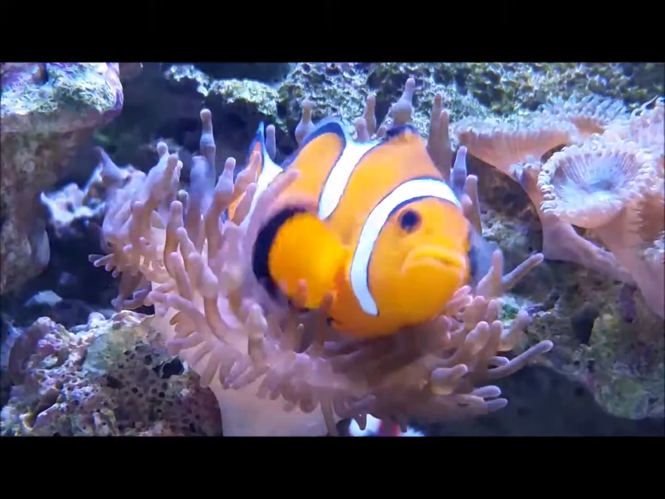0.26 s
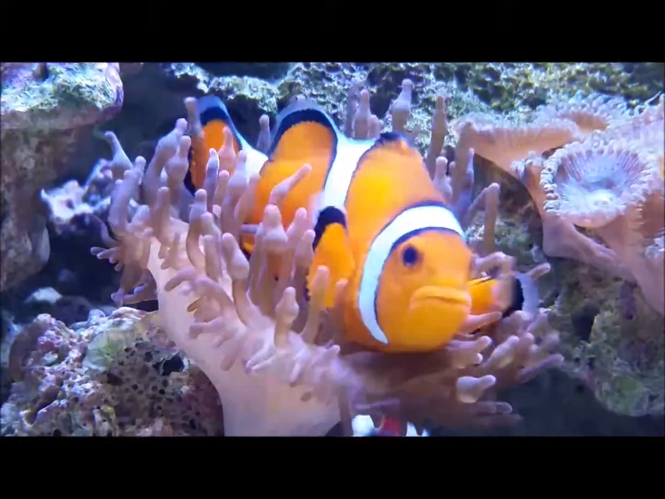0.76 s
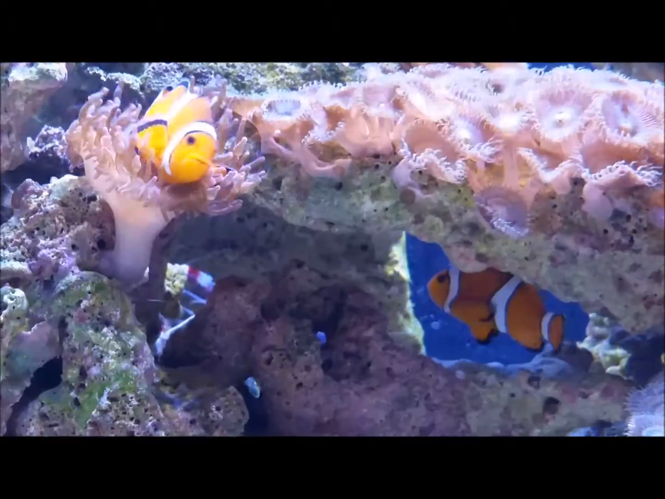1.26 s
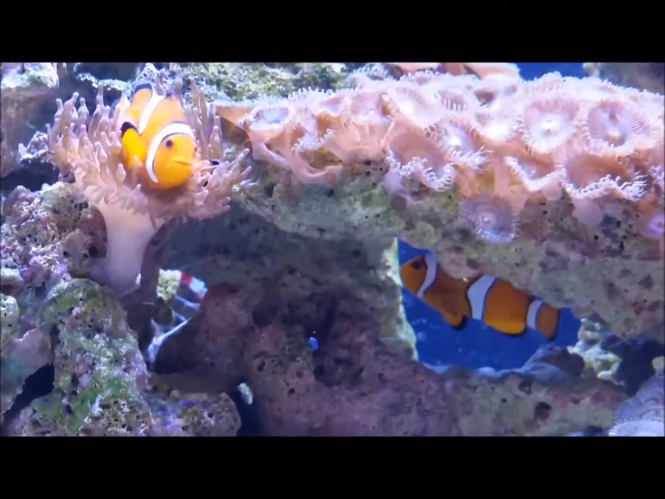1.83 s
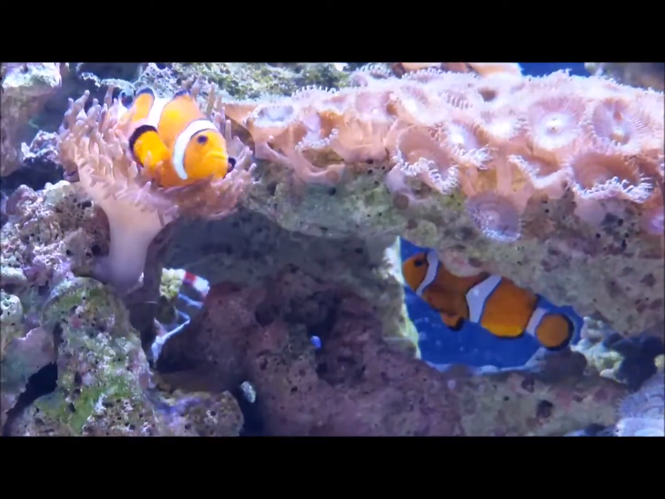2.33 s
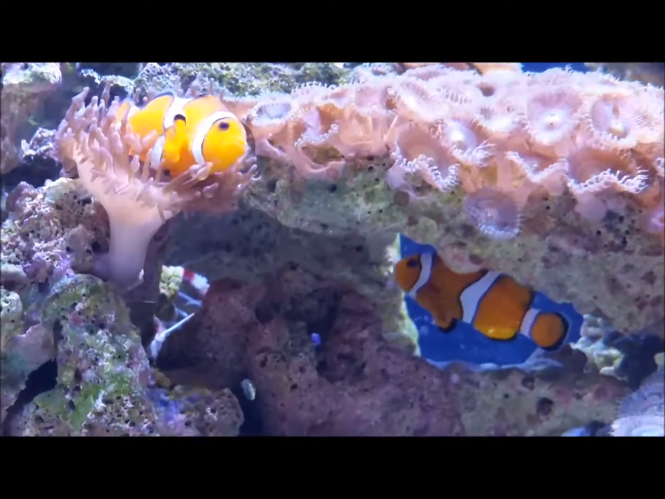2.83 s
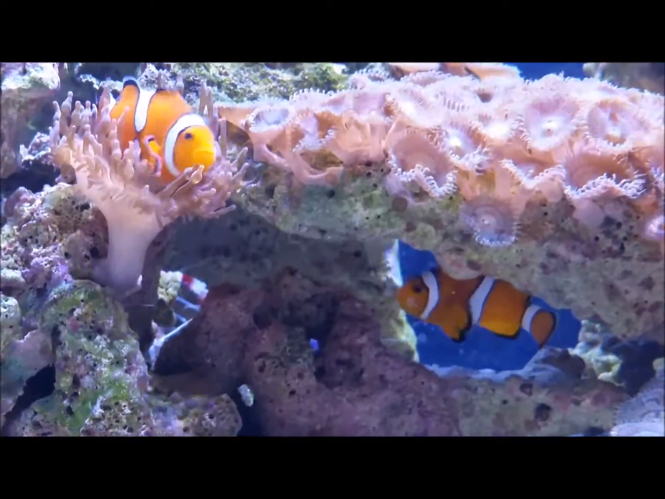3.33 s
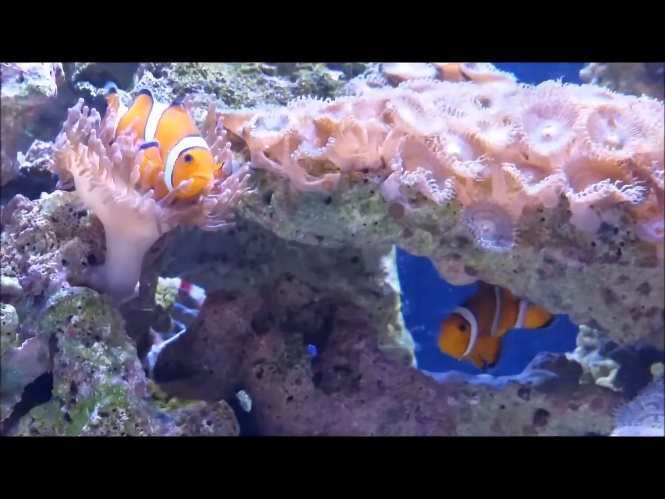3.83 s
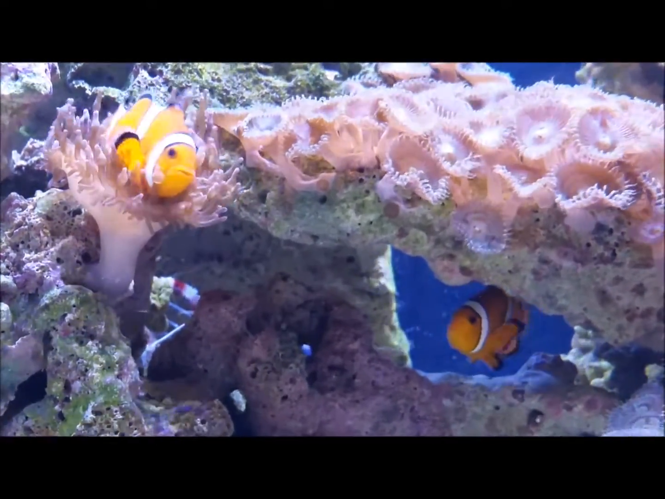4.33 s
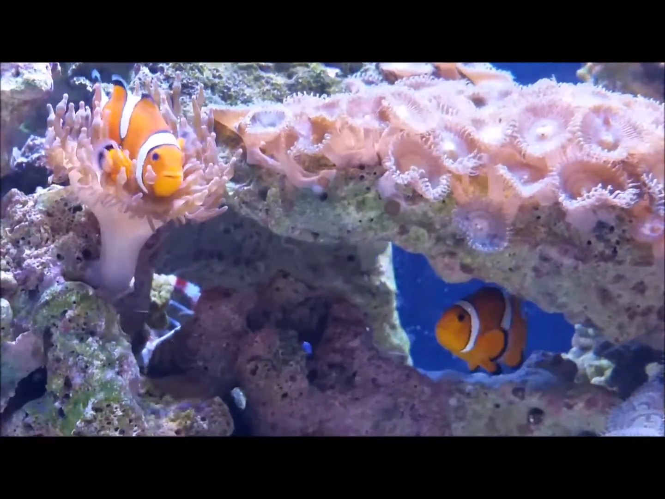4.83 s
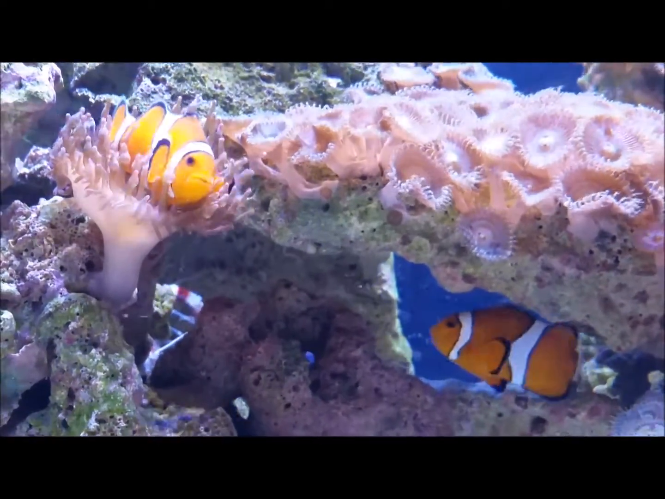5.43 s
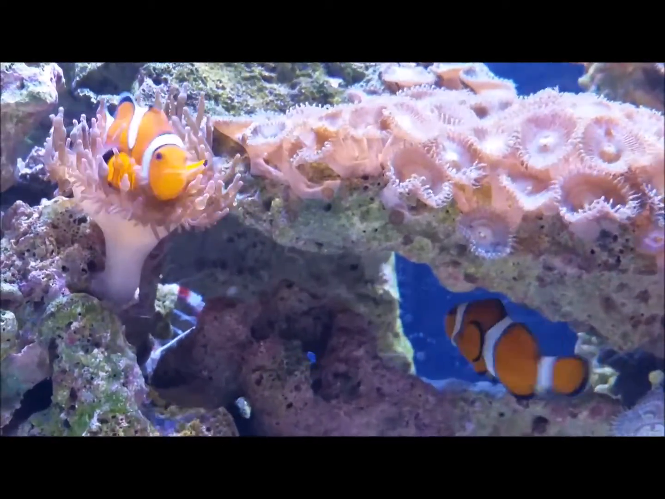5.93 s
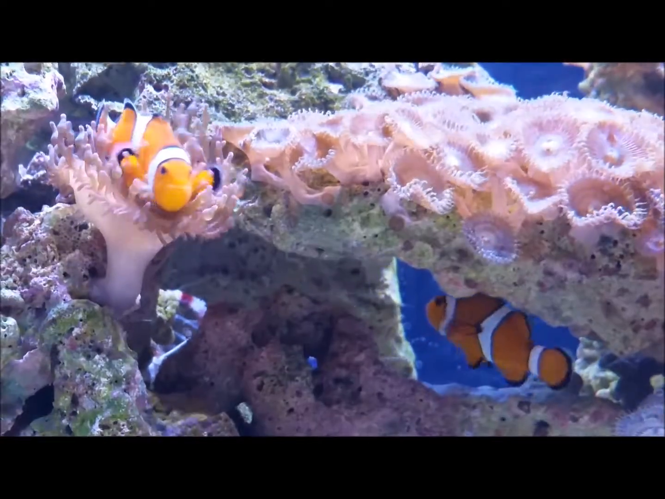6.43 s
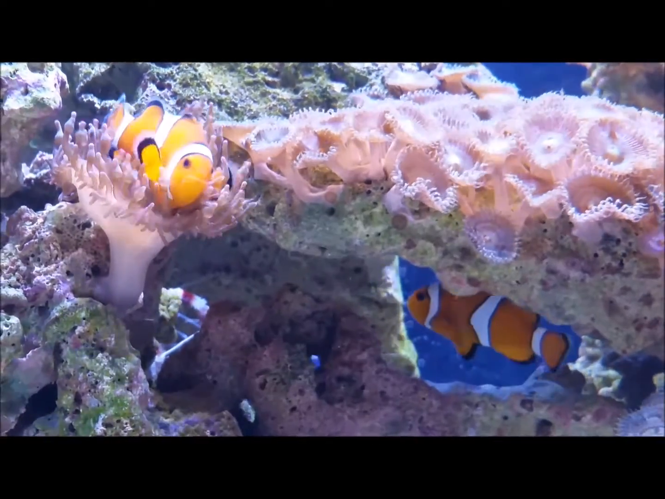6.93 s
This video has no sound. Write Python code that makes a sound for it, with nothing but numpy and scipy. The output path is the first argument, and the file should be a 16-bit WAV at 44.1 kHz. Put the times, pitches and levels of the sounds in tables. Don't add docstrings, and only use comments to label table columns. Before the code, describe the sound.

A heavy steady electric drone dominates the first second, left of center, while water rings in a pipe and air bubbles plop. An abrupt cut drops the drone to a soft indoor hum. Irregular watery tinkles and light spray continue over gently heaving rumble, with a faint motor hiss close to the stereo microphone's left side, occasional dull knocks and a small gurgling run near the end.

```python
import sys
import numpy as np
from scipy import signal
from scipy.io import wavfile
from scipy.ndimage import uniform_filter1d

SR = 44100
rng = np.random.default_rng(int(sys.argv[2]) if len(sys.argv) > 2 else 0)


def unload_wav(signal):
    wavfile.write(
        sys.argv[1],
        SR,
        np.round(np.clip(np.atleast_2d(signal).T, -1, 1) * 32767).astype(np.int16),
    )


def invert_db(x):
    u = np.asarray(x, float) / 20
    return 10 ** u


N = 316638
NEAR, FAR = 0, 1
CHANGE_S = 1.10699


def evened(x):
    return x / np.sqrt(np.mean(x ** 2) + 1e-20)


def read(points, hz):
    f, value = np.transpose(points)
    return np.interp(np.log(hz + 1), np.log(f + 1), value)


def ports(pan_db):
    return invert_db(np.array([[.5], [-.5]]) * pan_db)


def add(mix, s, sound, pan_db):
    part = mix[:, round(s * SR):][:, :len(sound)]
    part += sound[:part.shape[1]] * ports(pan_db)


def correlated(left, other, like):
    like = np.clip(like, -1, 1)
    return like * left + np.sqrt(1 - like ** 2) * other


def noise(spectrum, size, patchy_db, count=N, same=((1, 0),), tilt=((1, 0),), modes=(), surge=((0, 0),)):
    surge_hz, surge_octaves, surge_share = 232, 0.98, 0.56
    top_hz = min(spectrum[-1][0], 15715)
    frames, hz = 4 * count // size + 5, np.fft.rfftfreq(size, 1 / SR)
    a, b, c, d, patches = rng.standard_normal((frames, len(hz), 5)).T
    patches = uniform_filter1d(patches, size=12, axis=0)
    patches = evened(uniform_filter1d(patches, size=8, axis=1))

    shape_db = read(spectrum, hz) - 80 * ((hz < spectrum[0][0]) | (hz > top_hz))
    for f, width, db in modes:
        shape_db += db / (1 + (2 * (hz - f) / width) ** 2)
    swell_db = np.interp(np.arange(frames) * size / 4 / SR, *np.transpose(surge))
    swell_db = swell_db - np.max(surge, 0)[1]
    reach = surge_share * np.exp(-(np.log2((hz + 1) / surge_hz) / surge_octaves) ** 2)

    left = a + 1j * b
    z = np.array([left, correlated(left, c + 1j * d, read(same, hz)[:, None])])
    z *= invert_db(shape_db[:, None] + patchy_db * patches + np.outer(reach, swell_db))
    z *= ports(read(tilt, hz))[:, :, None]
    return evened(signal.istft(z, nperseg=size, noverlap=size - size // 4)[1][:, :count])


# frequency in Hz, left rms level in dB, right rms level in dB, right lag in radians.
HUM_NEAR = [(60, -38, -53, .3), (120, -22.5, -36.5, .8), (240, -58, -50, .6), (360, -51, -53, 2.8),
            (480, -58, -64, .5), (600, -66, -75, .5)]
HUM_FAR = [(120, -43, -43, 0), (240, -58, -59, .3), (360, -67, -67, 0)]


def hum(place, count):
    lines, sign = [(HUM_NEAR, 1), (HUM_FAR, -1)][place]
    crest_s = 1.1075
    t = np.arange(count) / SR - crest_s
    hz, left_db, right_db, lag = np.transpose(lines)[:, :, None]
    left = invert_db(left_db) * np.cos(2 * np.pi * hz * t)
    right = invert_db(right_db) * np.cos(2 * np.pi * hz * t - lag)
    return sign * np.sqrt(2) * np.array([left.sum(0), right.sum(0)])


# frequency in Hz, density in dB per Hz.
RUMBLE_NEAR = [(15, -28.5), (30, -6.5), (55, -6), (90, -4.5), (110, 5.5), (190, -5), (230, -3.5), (340, -9),
               (400, -13.5), (520, -23.5), (640, -21.5), (1000, -24), (1900, -36.5), (2600, -63)]
RUMBLE_FAR = [(15, -20.5), (33, -10.5), (45, -7), (105, -5), (160, 0.5), (230, -1.5), (260, -5.5),
              (350, -11.5), (450, -16.5), (600, -25), (900, -25.5), (1200, -28.5), (1900, -34.5),
              (2600, -49.5)]
# frequency in Hz, width in Hz, lift in dB.
MODES_NEAR = [(92, 24, 4), (142, 20, -6), (188, 26, 8), (320, 50, 4), (465, 30, 4), (640, 60, 3),
              (1070, 30, 6)]
MODES_FAR = [(43, 7, 5), (91, 12, 6), (104, 8, -5), (167, 11, 8), (186, 10, -3), (206, 13, 7),
             (320, 10, 10), (345, 12, -5), (363, 5, 13)]
# frequency in Hz, likeness from -1 to 1.
SAME_NEAR = [(60, .5), (160, .65), (270, .2), (450, .1), (740, .6), (1200, 0)]
SAME_FAR = [(40, 0.65), (100, 0.95), (270, 1), (450, 0.7), (740, 0.38), (1200, -0.0092), (2000, -0.26)]
# frequency in Hz, left minus right in dB.
TILT_NEAR = [(30, 6), (70, 10), (190, 9), (225, 1), (320, 3), (450, 5), (740, 2), (1200, -1)]
TILT_FAR = [(60, 0.76), (270, -2.4), (740, 0.91), (2000, -1.6)]
# time in seconds, level in dB.
SURGE = [
    [(0, -41.5), (.65, -43.5), (.8, -44), (1.1, -42.5)],
    [(1.2, -47), (2.0, -44.5), (2.55, -44), (3.1, -46), (3.5, -41), (4.2, -46.5), (4.6, -43), (5.1, -44.5),
     (5.75, -48), (6.35, -43), (6.9, -40), (7.15, -45)],
]


def rumble(place, count):
    if place == NEAR:
        return invert_db(-36.5) * noise(RUMBLE_NEAR, size=4096, patchy_db=0.95, count=count, same=SAME_NEAR,
                                  tilt=TILT_NEAR, modes=MODES_NEAR, surge=SURGE[NEAR])
    return invert_db(-42) * noise(RUMBLE_FAR, size=4096, patchy_db=0.93, count=count, same=SAME_FAR,
                            tilt=TILT_FAR, modes=MODES_FAR, surge=SURGE[FAR])


# frequency in Hz, density in dB.
MOTOR_LEFT = [(2500, -31), (2800, -11), (3200, 0), (3600, 3), (4200, -2), (4700, -14.5), (5000, -27.5),
              (6000, -32.5)]
MOTOR_RIGHT = [(2400, -8), (3000, -5), (3600, -0.5), (4400, -4), (5000, -17), (6000, -19.5), (7500, -28)]


def camera_motor():
    left = invert_db(-58.5) * noise(MOTOR_LEFT, size=512, patchy_db=1.14)[0]
    right = invert_db(-68.5) * noise(MOTOR_RIGHT, size=512, patchy_db=2.3)[0]
    return np.array([left, right])


def resonate(x, hz, width):
    turn = np.exp(2j * np.pi * hz * np.arange(x.shape[-1]) / SR)
    r = np.exp(-np.pi * width / SR)
    return 2 * (turn * signal.lfilter([(1 - r) ** 2], [1, -2 * r, r * r], x / turn)).real


def ring(modes, count):
    drops_per_s, spread_db = 700, 1.7
    size = invert_db(spread_db * np.minimum(rng.exponential(1, (2, count)), 5))
    size *= rng.choice([-1, 1], (2, count))
    drops = size * (rng.random((2, count)) < drops_per_s / SR)
    out = np.zeros((2, count))
    for hz, width, db, like, pan_db in modes:
        left, other = evened(resonate(drops, hz, width))
        out += invert_db(db) * ports(pan_db) * np.array([left, correlated(left, other, like)])
    return evened(out)


def gushes(rows, column, steady_db, rise_s, count):
    t = np.arange(0, count + 64, 64) / SR
    power = invert_db(2 * steady_db)
    for row in rows:
        crest_s, fade_s = row[:2]
        late = t - crest_s
        shape = np.exp(-np.where(late < 0, (late / rise_s) ** 2, late / fade_s))
        power = power + invert_db(2 * row[column]) * shape
    return np.interp(np.arange(count) / SR, t, np.sqrt(power))


# frequency in Hz, width in Hz, level in dB, port likeness, left minus right in dB.
PIPE = [
    [(1300, 81, -14, 0.12, -8.5), (1356, 88, -5, -0.26, -1.5), (1426, 57, -10, 0.32, -0.5)],
    [(1293.4, 59, 2, 0.8, 2), (1358, 40, 2, -0.5, -3.5), (1434, 43, -5.5, 0.7, -8)],
]
SPLASH = [
    [(1563, 120, 0, 0, -7), (1650, 39, -3.5, 0.0032, -7.5), (1761, 44, -4.5, 0.0054, -8),
     (2310, 300, -11.5, 0.003, 4)],
    [(1681, 210, 2, -0.09, -3), (1748, 43, -5.5, -0.2, 1), (1882, 79, -3.5, -0.6, -9.5),
     (2157, 110, -5.5, 0.73, -2.5), (2334, 160, -4.5, -0.1, -5)],
]
# crest in seconds, fade in seconds, pipe note in dB, splash in dB.
GUSHES = [
    [(.01, 0.052, -51, -62.5), (.5, 0.065, -49, -58.5), (.765, .05, -61, -69.5), (.875, 0.021, -61.5, -74),
     (1.03, 0.032, -61, -73)],
    [(1.32, 0.088, -68.5, -66), (1.52, 0.073, -74, -64.5), (1.63, 0.086, -61, -74),
     (2.13, 0.13, -62.5, -72), (2.32, 0.053, -65.5, -65.5), (2.41, 0.085, -65, -64.5),
     (2.88, 0.033, -68, -72), (3.01, .04, -67, -83), (3.57, 0.11, -64.5, -73), (3.68, .06, -73, -67.5),
     (3.78, 0.027, -74, -65), (3.88, 0.13, -66, -73), (4.19, 0.14, -68.5, -82), (4.55, .06, -63, -69.5),
     (4.71, 0.12, -62.5, -62.5), (5.04, 0.043, -60, -68), (5.23, .1, -62.5, -70.5), (5.49, .08, -64, -73),
     (5.6, 0.088, -71, -67), (5.76, .08, -68, -75), (5.92, 0.15, -71, -68), (6.42, .04, -65, -64),
     (6.5, 0.11, -60, -67), (7.05, .1, -63, -75), (7.17, .05, -69, -72)],
]
GUSH_RISE_S = [0.081, 0.028]
# pipe note in dB, splash in dB.
TRICKLE = [
    (-60.5, -74),
    (-70.5, -78.5),
]


def overflow(place, count):
    rows, rise_s = GUSHES[place], GUSH_RISE_S[place]
    note_db, splash_db = TRICKLE[place]
    note = gushes(rows, 2, note_db, rise_s, count) * ring(PIPE[place], count)
    splash = gushes(rows, 3, splash_db, rise_s, count) * ring(SPLASH[place], count)
    return invert_db(0.5) * note + invert_db(2.0) * splash


# frequency in Hz, density in dB per Hz.
SPRAY = [
    [(4500, 0), (5700, -5), (6050, -16), (6500, -10), (7300, -12), (7700, -17), (9000, -18), (9600, -8),
     (10300, -1), (12200, 0), (15700, 0)],
    [(4500, -2), (5700, -7), (6100, -12), (6500, -11), (8300, -20), (9200, -15), (10400, -1), (11400, -2),
     (12200, 2), (13200, -1), (15700, 0)],
]
# frequency in Hz, left minus right in dB.
SPRAY_TILT = [
    [(7300, 0), (7700, 7), (9000, 7), (9600, 0)],
    [(7300, 0), (9600, -.5)],
]
# crest in seconds, fade in seconds, level in dB.
SPURTS = [
    [(.36, .15, -79)],
    [(1.2, .3, -81), (2.14, 0.13, -78.5), (3.15, 0.28, -83), (4.71, 0.089, -79), (5.05, 0.054, -80),
     (5.88, 0.081, -82), (6.77, 0.13, -78.5), (7.09, .2, -79.5)],
]
MIST_DB = [-81, -78.5]


def spray(place, count):
    hiss = noise(SPRAY[place], size=1024, patchy_db=0.9, count=count, tilt=SPRAY_TILT[place])
    return invert_db(3.5) * gushes(SPURTS[place], 2, MIST_DB[place], 0.034, count) * hiss


# start in
# seconds, peak level in dB, frequency in Hz, t60 in seconds, left minus right in dB.
BUBBLES = [(0.185, -47, 635, .06, -1), (0.33, -43.5, 660, .055, -2), (0.477, -47, 700, .06, 4),
           (0.61, -46, 648, .06, 2), (0.73, -41, 630, .055, -0.5), (0.769, -37, 620, .05, 1),
           (0.896, -40.5, 668, .06, -2), (1.026, -37, 630, .055, 2), (1.698, -54, 546, .06, -3),
           (6.192, -52, 522, .055, 5), (6.463, -51, 640, .052, 1), (6.741, -48, 542, .06, .5),
           (1.016, -35, 322, .15, 6.5), (6.17, -43, 357, .17, 2),
           (6.806, -48, 520, .1, -1),
    (6.828, -49, 545, .1, 0),
    (6.862, -48, 535, .1, -2),
]


def gulps():
    out, t = np.zeros((2, N)), np.arange(6000) / SR
    onset = 1 - np.exp(-t / 0.0042)
    sag = 1 + 0.4 * np.exp(-t / 0.0032)
    for s, db, hz, t60, pan_db in BUBBLES:
        turns = np.cumsum(hz * sag) / SR
        decay = invert_db(db + 4.0 - 60 * t / t60)
        add(out, s - .002, decay * onset * np.sin(2 * np.pi * turns), pan_db)
    return out


# start in seconds, peak level in dB, frequency in Hz, t60 in seconds, left minus right in dB.
SNAP = (1.956, -55.5, 5200, .003, -2)
# start in seconds, peak level in dB, left minus right in dB.
TICKS = [
    (3.148, -56, 4),
    (3.468, -44, 12),
    (3.555, -39.5, -2),
    (4.472, -50, 7.5),
    (4.573, -53, 12),
    (4.711, -56, 7.5),
    (7.157, -43, 1),
]


def ticks():
    tick_hz, tick_t60_s = 900, 0.0071
    out, t = np.zeros((2, N)), np.arange(6000) / SR
    knocks = [(s, db, tick_hz, tick_t60_s, pan_db) for s, db, pan_db in TICKS]
    for s, db, hz, t60, pan_db in [SNAP] + knocks:
        add(out, s, invert_db(db + 1.5 - 60 * t / t60) * np.sin(2 * np.pi * hz * t), pan_db)
    return out


def scene():
    def aquarium(place, count):
        return hum(place, count) + rumble(place, count) + overflow(place, count) + spray(place, count)

    change = round(CHANGE_S * SR)
    mix = aquarium(FAR, N)
    mix[:, :change] = aquarium(NEAR, change)
    return mix + camera_motor() + gulps() + ticks()


def band_limit(x):
    return signal.sosfilt(signal.butter(12, 16400, fs=SR, output="sos"), x)


def record(dry):
    return band_limit(dry - .0006)


dry = scene()
out = record(dry)
unload_wav(out)
```